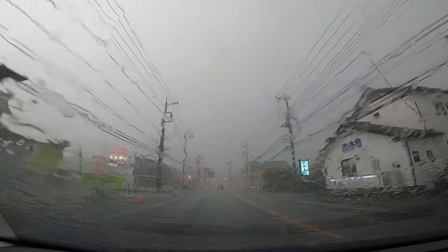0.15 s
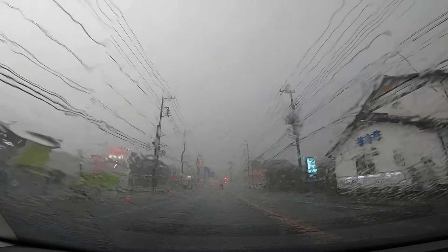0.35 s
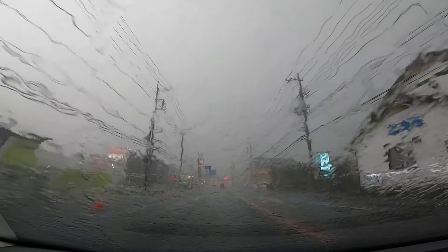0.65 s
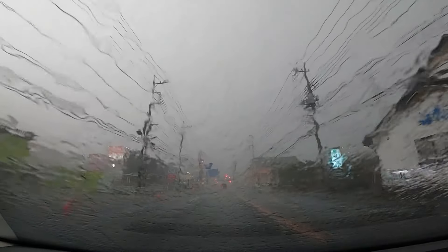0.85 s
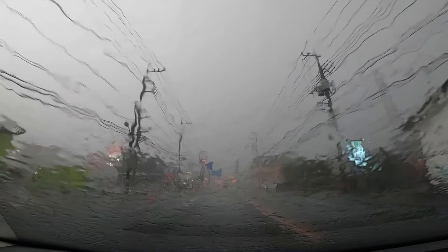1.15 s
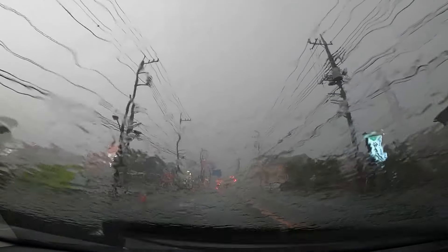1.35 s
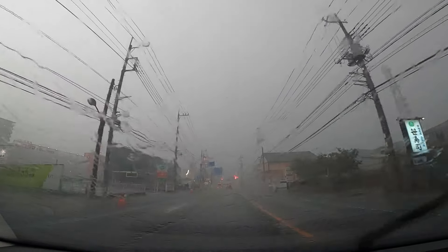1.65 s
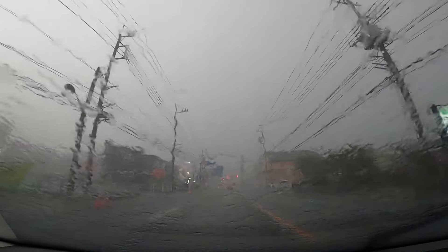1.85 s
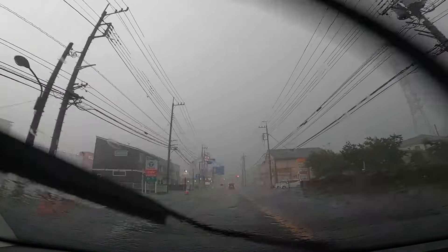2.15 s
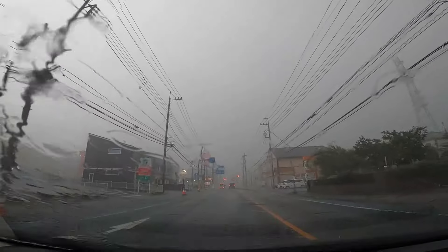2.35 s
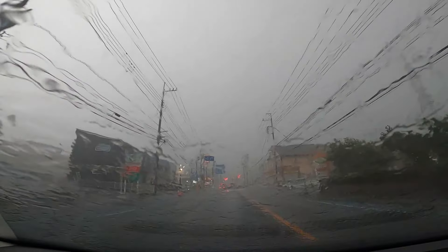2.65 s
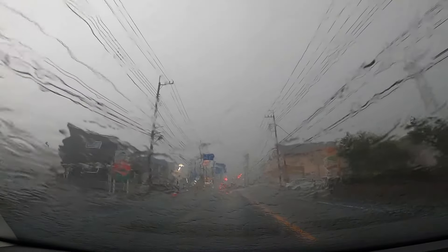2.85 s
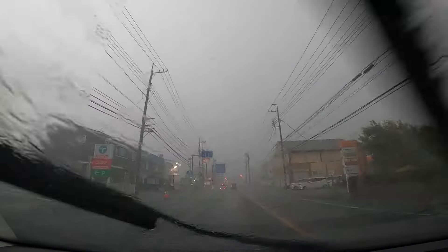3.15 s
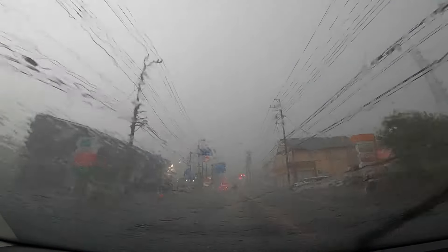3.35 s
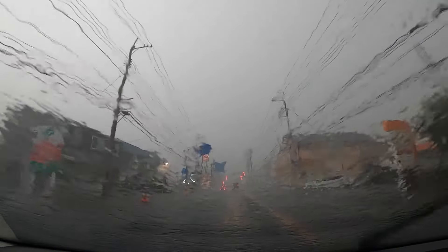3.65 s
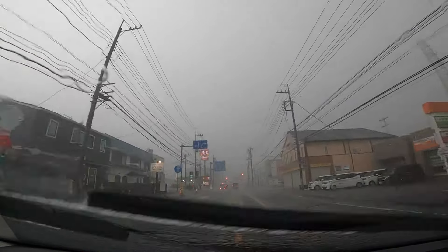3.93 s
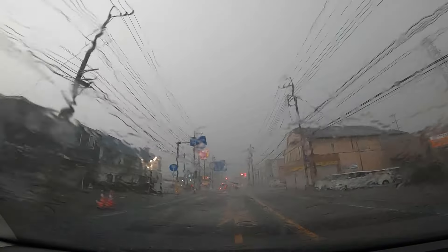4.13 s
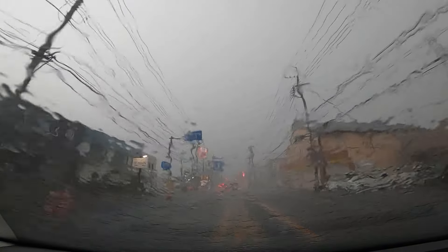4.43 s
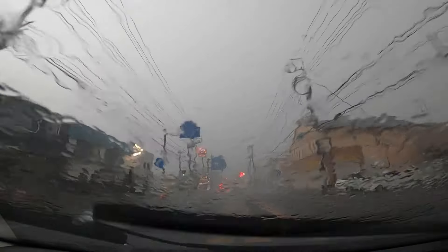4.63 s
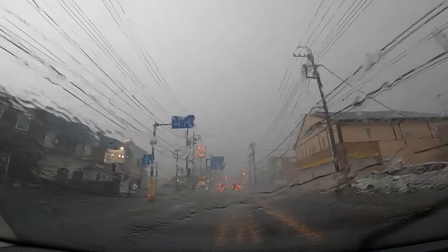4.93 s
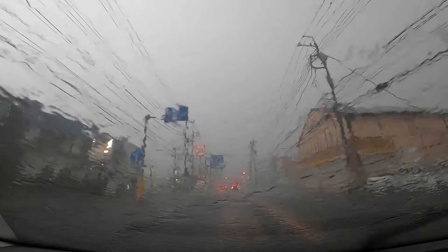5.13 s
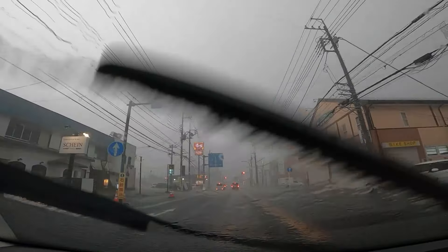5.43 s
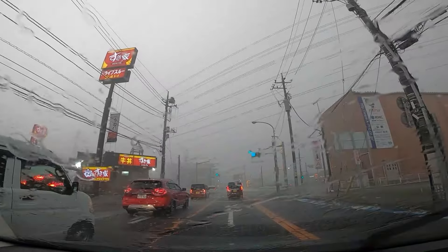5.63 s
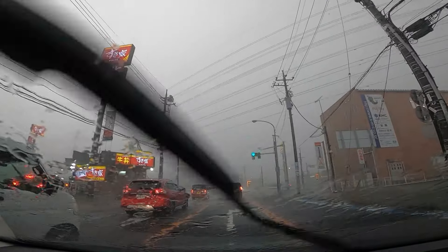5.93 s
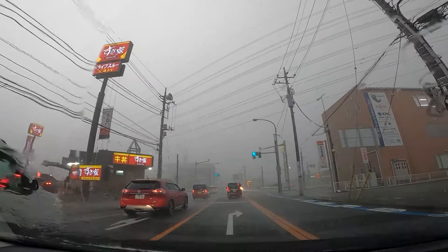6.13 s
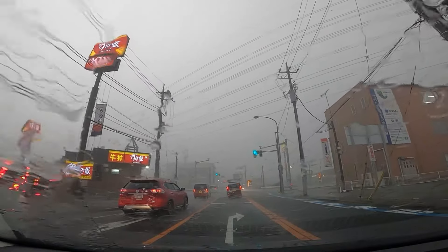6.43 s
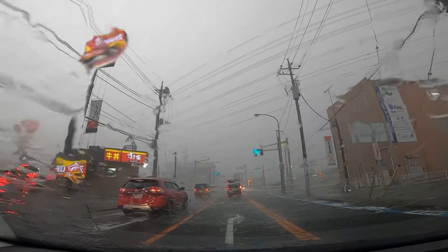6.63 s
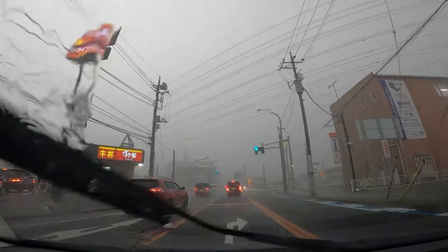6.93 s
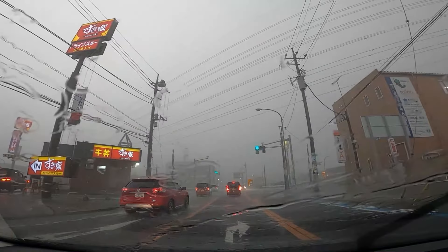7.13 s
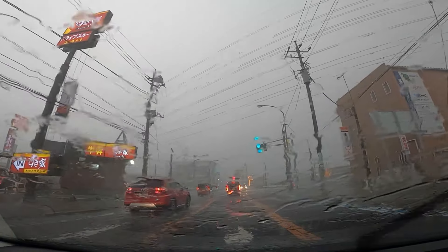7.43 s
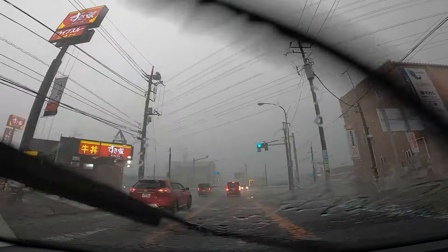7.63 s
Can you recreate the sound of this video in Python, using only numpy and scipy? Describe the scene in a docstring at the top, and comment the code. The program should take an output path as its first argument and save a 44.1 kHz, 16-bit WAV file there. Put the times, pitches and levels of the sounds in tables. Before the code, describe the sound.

A microphone inside the cabin catches wide stereo rain pattering close on the glass, with bass wind and tyre rumble beneath. Spatters thicken into a hard burst, followed by rapid muffled water thumps against the underside. The rain eases, surges again, then abruptly drops at a cut; softer patter, wet hiss and a slow car's engine hum remain.

```python
"""Rain in a downpour spatters in sheets on the windscreen and roof of a moving car: random drop impacts
ring through panel spectra, with a few fat drops; an edit click marks a cut to thinner rain. Filtered noise
makes the wet hiss, the tyres, the shudder, the boom and the drone; slugs of puddle water drum on a modal
floor pan. Late on the car is slower and the engine's hum, a sum of harmonics, comes through."""
import sys
import numpy as np
from scipy import signal
from scipy.fft import rfft, irfft, next_fast_len
from scipy.io import wavfile
from scipy.ndimage import uniform_filter1d, minimum_filter1d, map_coordinates

SR = 44100
rng = np.random.default_rng(int(sys.argv[2]) if len(sys.argv) > 2 else 0)


def materialize(psi):
    """Save the field psi as 16-bit PCM at rate SR to the path in sys.argv[1].

    A 1-D psi becomes a single channel; in a 2-D psi each row is a channel.
    """
    bounded = np.clip(np.atleast_2d(psi).T, -1, 1)
    quanta = np.round(bounded * 32767).astype(np.int16)
    wavfile.write(sys.argv[1], SR, quanta)


N = 343098

# response of the glass to a drop: (frequency [Hz], density [dB per Hz])
GLASS_PATTER = [(300, -21), (700, -7.5), (1500, -6), (2200, -4), (2950, -2), (3700, -4.5), (4500, -13),
                (6000, -10.5), (8000, -17.5), (10000, -53), (16000, -100)]
# slugs of puddle water against the floor:
# (time of the peak [s], strength [dB], splash relative to the strength [dB], centre of the thump [Hz])
WATER_SLUGS = [(1.652, -12.5, -11, 228), (1.668, -11, -28, 197), (1.733, -8, -23, 230.5),
               (1.779, -9, -14, 150), (1.798, -8.5, -15, 203), (1.843, -9.5, -17.5, 125),
               (1.859, -7.5, -15, 166), (1.881, -10.5, -22, 212), (1.913, -6, -24, 156),
               (2.004, -15, -22, 168), (2.056, -10, -30, 150), (2.085, -7.5, -17, 177),
               (2.133, -11.5, -18, 129), (2.176, -4.5, -26, 151), (2.193, -15.5, -19, 175),
               (2.22, -6, -23.5, 141), (2.404, -13.5, -19, 167.8), (2.496, -12.5, -23.5, 133),
               (2.955, -17.5, -17, 146), (3.28, -17, -12, 241), (3.782, -12, -14.5, 203),
               (4.963, -15, -20, 190), (5.461, -17, -27, 250), (7.52, -15, -12, 161)]
USUAL_RAIN_DB = -38  # reference strength for the growth of spray and wash


def rainfall():
    """Addition of powers: unrelated sheets of rain add their energy to the steady fall; strength in dB."""
    # steady rain between the sheets: (time [s], strength [dB])
    steady_fall = [(0, -38), (.8, -40.5), (1.2, -39), (1.8, -38.5), (2.2, -44), (2.31, -45.5), (2.4, -43.5),
                   (2.7, -42.5), (3.05, -44.5), (4.53, -38.5), (4.64, -43.5), (5.535, -39.5), (5.545, -48),
                   (5.85, -45.5), (6.2, -55.5), (6.7, -48.5), (7.1, -43), (7.78, -42.5)]
    # sheets blown against the car: (time of the peak [s], strength [dB], rise [s], fall [s])
    sheets = [(0.028, -36, 0.13, 0.26), (0.55, -42.5, 0.053, 0.022), (0.69, -38, 0.034, 0.034),
              (0.968, -34, 0.068, 0.05), (1.064, -33, 0.057, 0.071), (1.33, -40, 0.28, 0.12),
              (1.565, -28.5, 0.03, 0.055), (1.629, -29, 0.075, 0.11), (1.78, -36.5, 0.075, 0.086),
              (2.88, -41.5, 0.098, 0.078), (3.125, -35, 0.05, .055), (3.355, -27.5, 0.165, 0.15),
              (3.619, -35, 0.11, 0.036), (3.86, -31.5, 0.22, 0.22), (4.04, -34, 0.11, 0.15),
              (4.309, -33.5, 0.097, 0.23), (4.829, -37.5, 0.12, 0.15), (5.184, -32.5, 0.065, 0.077),
              (5.22, -35, 0.3, 0.23), (7.52, -39, 0.23, 0.19)]
    steady_db, = curves(steady_fall)
    power = amp(steady_db) ** 2
    for s, db, rise_s, fall_s in sheets:
        power = power + (amp(db) * swell(s, rise_s, fall_s)) ** 2
    return 10 * np.log10(power)


def rain(rain_db):
    """Shot noise through resonant panels: heavier rain is louder and denser, and each blow throws up spray."""
    # how much the wind chops the rain into quick spatters: (time [s], depth [dB])
    chop = [(0, 1), (.5, 1.6), (1.2, 1.6), (1.5, 1.6), (1.6, .4), (7.78, .4)]
    # colour of the spray: (frequency [Hz], density [dB per Hz])
    spray_spectrum = [(2000, -24.5), (3800, -10), (5000, 10), (6300, 5.5), (7600, -1.5), (8500, -16),
                      (10000, -20.5), (12500, -24.5), (14000, -33.5), (16000, -62)]
    # fine spray relative to its usual share: (time [s], level [dB])
    fine_spray = [(0, 1), (1.05, 0.7), (1.8, 0), (2.85, 2), (3.35, 0.5), (4.6, 0.1), (6.2, 1.5), (7.6, 1)]
    spray_usual_db, spray_growth = -45.5, 1.05  # before the fine-spray curve; growth in dB per dB of rain

    density = amp(.5 * (rain_db - rain_db.max()))
    blows = impacts(per_second=9000 * density, scatter_db=1.0) / np.sqrt(density)
    blows = unit(cabin(blows, t60=0.09, wet_db=-8.5))
    # sparser, heavier drops stand out of the sheet as separate splashes
    taps = plips(density, per_second=1500, centre_hz=4600, octaves=.45, cycles=10)
    chop_db, = curves(chop)
    spatter = amp(chop_db * (wobble(30) + wobble(110)) / np.sqrt(2))
    blows = spatter * (blows + amp(-10.5) * taps)

    patter = amp(rain_db + 2.0) * steadied(spread(struck(blows, GLASS_PATTER)), span=.05)
    fine_db, = curves(fine_spray)
    spray_db = spray_usual_db + spray_growth * (rain_db - USUAL_RAIN_DB) + fine_db + .4 * wobble(14)
    return patter + amp(spray_db) * spread(struck(blows, spray_spectrum))


def impacts(per_second, scatter_db):
    """Poisson process: blows fall independently, uneven in size, each from its own place on the panel."""
    hit = rng.random(N) < per_second / SR
    size = amp(scatter_db * np.clip(rng.standard_normal(N), -2.5, 2.5))
    place = rng.uniform(0, 2 * np.pi, N)
    return unit(hit * size * np.array([np.cos(place), np.sin(place)]))


def plips(density, per_second, centre_hz, octaves, cycles, size=256):
    """Damped oscillation: splashes in the film of water decay by 60 dB in a set number of cycles."""
    at = np.flatnonzero(rng.random(N - size) < per_second * density[:N - size] / SR)
    chance = np.clip(rng.standard_normal((len(at), 3)), -2, 2)
    pitch, strength, place = chance.T[:, :, None]
    turns = centre_hz * 2 ** (octaves * pitch) * np.arange(size) / SR
    grains = amp(2.5 * strength - 60 * turns / cycles) * np.sin(2 * np.pi * turns)
    where = (at[:, None] + np.arange(size)).ravel()
    pair = [np.bincount(where, (grains * side(np.pi * place)).ravel(), N) for side in (np.cos, np.sin)]
    return unit(np.array(pair) / np.sqrt(density))


def cabin(x, t60, wet_db, size=2048):
    """Early reflection from glass and dashboard: short decaying echoes, redrawn for each block of samples."""
    blocks = np.pad(x, ((0, 0), (0, -N % size))).reshape(2, -1, size)
    tails = rng.standard_normal(blocks.shape) * amp(-60 * np.arange(size) / SR / t60)
    tails /= np.linalg.norm(tails, axis=2, keepdims=True)
    echo = irfft(rfft(blocks, 2 * size) * rfft(tails, 2 * size))
    # the second half of each echo overlaps the next block
    joined = echo[..., :size] + np.roll(echo[..., size:], 1, axis=1)
    return x + amp(wet_db) * joined.reshape(2, -1)[:, :N]


def fat_drops():
    """Impulse excitation: a big drop ticks, knocks the glass and throws off a brief shower of droplets."""
    # fat drops: (time [s], strength [dB], left minus right [dB], strength of the knock [dB])
    drops = [(0.0464, -34, 1, 0), (0.8723, -32.5, -1, 14), (0.9093, -36, -1, 11), (0.961, -33, -4, 7),
             (1.0688, -30, 2, 7), (1.152, -35, -2, -2), (1.1862, -28, -4.5, -4), (1.2094, -37, -4, 0),
             (1.283, -39, 5, 17), (1.311, -33.5, -1, 14), (1.349, -35, -8, 9), (1.437, -33.5, -2, 15),
             (1.4752, -30, -2, 9), (1.485, -31, 1, 4), (1.491, -30, -4, 7), (1.534, -32, -5, -1),
             (2.3955, -34.5, -3, -14), (3.263, -34, -3, 0), (3.82, -35, 1, -6), (3.9949, -28, -4, -14.5),
             (5.2586, -32, -4.0, -3), (5.323, -31.5, -1, 3), (7.086, -39, 1, 5), (7.106, -36.5, 2, 14),
             (7.2986, -35.5, -4, 10)]
    # colour of the burst: (frequency [Hz], density [dB per Hz])
    splat_spectrum = [(400, -3), (1200, 9), (3000, 7.5), (6300, 0), (7800, -1.5), (9000, -18), (12500, -35),
                      (16000, -30)]
    splats, knocks = np.zeros((2, 2, N + SR))
    t = np.arange(SR // 20) / SR
    for s, db, pan_db, knock_db in drops:
        droplets = 0.4 * (rng.random(len(t)) < 900 / SR) * amp(-60 * t / 0.12)
        burst = rng.standard_normal((2, len(t))) * (0.36 * amp(-60 * t / 0.018) + droplets)
        burst[:, 0] = 1  # the tick of first contact
        burst *= amp(db + np.array([[pan_db], [-pan_db]]) / 2)
        splats[:, round(s * SR):][:, :len(t)] += amp(9.0) * burst
        knocks[:, round(s * SR):][:, :len(t)] += amp(knock_db - 6) * burst
    return struck(splats, splat_spectrum) + struck(knocks, GLASS_PATTER)


def wash(rain_db):
    """Turbulent noise of water on roof and tyres, with duller shot noise of rain on steel; both follow the rain."""
    # colour of hiss and drumming: (frequency [Hz], density [dB per Hz])
    wet_spectrum = [(200, -1), (380, -6), (500, 0.5), (680, -5), (830, 0), (920, 0), (1200, -1), (1800, -6),
                    (2500, -10.5), (4000, -21), (8000, -37.5), (16000, -100)]
    usual_db, growth, slow_gain_db = -35.5, 0.63, 6  # growth in dB per dB of rain; gain once the car is slow
    level_db = usual_db + growth * (rain_db - USUAL_RAIN_DB) + slow_gain_db * slowness()
    drumming = spread(struck(impacts(per_second=900, scatter_db=2.5), wet_spectrum))
    return amp(level_db + 0.22 * wobble(13)) * (rush(wet_spectrum) + amp(-2.5) * drumming)


def slowness():
    """Smoothed step function: 0 while the car is at speed, 1 once it is slow."""
    slow_from_s = 5.54
    return uniform_filter1d(1. * (np.arange(N) / SR > slow_from_s), SR // 100)


def windscreen(x):
    """Transmission through a resonant plate: some pitches pass more readily than others."""
    # resonances and the hollows between them: (centre [Hz], half width [Hz], gain [dB])
    glass_modes = [(844, 28, -4), (928, 16, 2), (980, 16, 1), (1193, 54, 1.5), (1345, 77, -1.5),
                   (1482, 16, 3.5), (1543, 22, 2), (1777, 36, 2.5), (2000, 51, -2.5), (2170, 88, 2),
                   (2370, 41, -3), (2980, 19, 0.5)]

    def gain(hz):
        return amp(sum(db * np.exp(-((hz - centre) / width) ** 2) for centre, width, db in glass_modes))

    return filtered(x, gain)


def puddle():
    """Modal excitation: a slug flexes the floor pan, leaves its modes ringing and splashes in the arches."""
    # floor pan: (nominal frequency [Hz], relative level [dB], decay by 60 dB [s])
    floor_modes = [(66, 11.5, 0.14), (125.3, 1, 0.15), (161.5, 7.5, 0.14), (195, 1.5, 0.099),
                   (250, -1.5, 0.17), (351.6, -8.5, 0.1), (481, 6.5, 0.1)]
    # colour of the splash in the wheel arch: (frequency [Hz], density [dB per Hz])
    splash_spectrum = [(150, -13), (250, 3), (370, -5.5), (425, -0.5), (490, 8.5), (580, -13.5),
                       (730, -5.5), (930, 0.5), (1400, -10), (2500, -16.5), (8000, -56)]
    rise_s, fall_s = .009, .015  # how quickly a slug pushes the floor and lets go
    focus_db = 7  # modes an octave from the slug's centre are driven this much less
    ring_db = -7  # peak of the ring relative to the full push
    thumps, splashes = np.zeros((2, N + SR))
    t = np.arange(SR // 4) / SR
    late = t - 2 * rise_s  # time after the peak
    push = np.exp(-np.minimum((late / np.where(late < 0, rise_s, fall_s)) ** 2, 20))
    onset = np.exp(-(np.minimum(late, 0) / rise_s) ** 2)
    for s, db, splash_db, centre_hz in WATER_SLUGS:
        flex = push * np.cos(2 * np.pi * centre_hz * late + rng.uniform(0, 2 * np.pi))
        modes = 0
        for hz, level_db, t60 in floor_modes:
            # each blow excites and tunes the modes a little differently
            level_chance, pitch_chance = rng.standard_normal(2)
            driven_db = level_db - focus_db * np.log2(hz / centre_hz) ** 2 + 2 * level_chance
            mode_hz = hz * (1 + 0.045 * pitch_chance)
            modes = modes + amp(driven_db - 60 * t / t60) * np.sin(2 * np.pi * mode_hz * t)
        ring = onset * (1 - push) * modes
        thump = flex + amp(ring_db) * ring / np.abs(ring).max()
        start = round((s - 2 * rise_s) * SR)
        thumps[start:][:len(t)] += amp(db - 2.5) * thump
        splash_decay_db = -60 * np.maximum(late, 0) / 0.11
        splashes[start:][:len(t)] += onset * amp(db + splash_db - 3.5 + splash_decay_db)
    return thumps[:N] + splashes[:N] * rush(splash_spectrum)


def tyres():
    """Filtered noise: tread rumble and water flung into the wheel arches surge in power with each slug."""
    # tyres on the wet road before wavering and surges: (time [s], rumble [dB], wheel-arch roar [dB])
    tyre_levels = [(0, -28, -35.5), (.7, -30.5, -37), (1.5, -26.5, -32), (1.75, -19.5, -26), (2, -25, -31),
                   (2.2, -29, -29.5), (2.3, -25, -34), (2.65, -29, -37), (3.35, -29, -31.5),
                   (3.55, -26.5, -34), (3.9, -25, -29.5), (4.6, -27.5, -33), (5.3, -27, -33),
                   (5.9, -28.5, -33), (6.2, -30, -38.5), (6.45, -31, -33.5), (6.65, -34.5, -39),
                   (7.05, -29.5, -33), (7.78, -31.5, -35.5)]
    # colour of the tread: (frequency [Hz], density [dB per Hz])
    rumble_spectrum = [(60, -22), (102, -5.5), (125, 6), (150, -1.5), (195, 1.5), (230, -7.5), (300, -23),
                       (2500, -120)]
    # colour of water in the arches: (frequency [Hz], density [dB per Hz])
    roar_spectrum = [(150, -33.5), (230, -2.5), (265, 0.5), (300, -4.5), (360, -3), (450, -14.5),
                     (540, -14), (800, -20), (6000, -120)]
    surge_rise_s, surge_fall_s = 0.035, 0.037
    surge_rumble_db, surge_roar_db = -16, -1  # relative to the slug and to its splash
    rumble_db, roar_db = curves(tyre_levels)
    rumble = amp(rumble_db + 0.59 * wobble(12))
    roar = amp(roar_db + 1.27 * wobble(14))
    for s, db, splash_db, _ in WATER_SLUGS:
        surge = amp(db) * swell(s, surge_rise_s, surge_fall_s)
        rumble = np.hypot(rumble, amp(surge_rumble_db) * surge)
        roar = np.hypot(roar, amp(splash_db + surge_roar_db) * surge)
    tread = rumble * steadied(rush(rumble_spectrum), span=0.097)
    return tread + roar * steadied(rush(roar_spectrum), span=.1)


def engine():
    """Harmonic series on the firing rate: wavering overtones are lifted where they meet the cabin's resonance."""
    # engine: (time [s], mean firing rate [Hz], level [dB])
    firing = [(0, 43.3, -34), (3.8, 43.66, -36), (4.35, 45.5, -26), (4.7, 44.24, -23), (4.95, 41.97, -31),
              (5.26, 41.62, -29), (5.35, 41.75, -23), (5.47, 38.9, -28), (5.6, 38.54, -28),
              (5.74, 40.44, -23), (5.85, 42.5, -17), (5.98, 44.36, -18), (6.12, 44.87, -19.5),
              (6.41, 46.2, -16.5), (6.53, 44.7, -20), (6.74, 41.08, -27), (6.9, 37.07, -30.5),
              (7.27, 34.76, -36), (7.55, 41.57, -19.5), (7.78, 43.8, -22)]
    # overtones: (multiple of the firing rate, relative level [dB], wavering [dB],
    # growth [dB per dB of engine level])
    overtones = [(1, -1.2, 1.6, 1), (2, -10.5, 2, .5), (3, -13.5, 2.5, 0.2), (4, -18.5, 2, 0.2),
                 (5, -20.5, 2.5, 0.47)]
    usual_db = -23  # engine level at which the relative levels hold
    cabin_hz, cabin_width_hz, cabin_lift_db = 77.05, 6.7, 10.5
    hz, db = curves(firing)
    phase = 2 * np.pi * np.cumsum(hz * (1 + .006 * wobble(9))) / SR
    hum = 0
    for k, level_db, waver_db, growth in overtones:
        lift_db = cabin_lift_db * np.exp(-((k * hz - cabin_hz) / cabin_width_hz) ** 2)
        overtone_db = level_db + growth * (db - usual_db) + lift_db + waver_db * wobble(8)
        hum = hum + amp(overtone_db) * np.sin(k * phase + rng.uniform(0, 2 * np.pi))
    return np.sqrt(2) * amp(usual_db) * hum


def road():
    """Band-limited noise: wind and road shake the cabin as a slow shudder, a deep boom and a floor drone."""
    # wind and road, before a fixed trim: (time [s], boom [dB], floor drone [dB])
    road_levels = [(0, -23.5, -28), (.35, -29, -31), (.5, -24, -22.5), (1, -23.5, -24.5), (1.4, -24, -19.5),
                   (1.62, -17.5, -23), (1.82, -24, -18.5), (2.12, -22, -24), (2.3, -28, -26.5),
                   (2.8, -30, -35), (3, -23.5, -27.5), (3.7, -25.5, -24.5), (4.1, -17, -26),
                   (4.7, -22, -25), (5, -36, -28.5), (5.25, -39, -17.5), (5.37, -13, -26.5),
                   (5.6, -32, -30.5), (6.6, -31, -31.5), (6.88, -21, -33), (7.2, -29, -29.5),
                   (7.78, -25, -28.5)]
    # slow shudder of the body in the wind: (time [s], level [dB])
    shudder_levels = [(0, -28), (.18, -25), (.55, -32), (.8, -33), (1.5, -27.5), (2.25, -35), (3.6, -27.5),
                      (4.12, -19.5), (4.3, -32), (4.75, -19.5), (5.05, -29.5), (5.4, -23), (5.7, -34.5),
                      (6.2, -43), (6.6, -42), (7.78, -30)]
    # colours of shudder, boom and drone: (frequency [Hz], density [dB per Hz])
    shudder_spectrum = [(8, -38), (18, -18), (25, 0.5), (31, 1.5), (38, -21.5), (120, -100)]
    boom_spectrum = [(20, -41), (36, -9.5), (46, 0), (60, -8.5), (90, -25), (500, -120)]
    drone_spectrum = [(35, -33), (62, -2.5), (82, 1), (100, -1), (140, -25), (800, -120)]
    boom_db, drone_db = curves(road_levels)
    shudder_db, = curves(shudder_levels)
    shudder = amp(shudder_db) * steadied(rush(shudder_spectrum), span=0.17)
    boom = amp(boom_db - 1.5) * steadied(rush(boom_spectrum), span=0.14)
    drone = amp(drone_db - 2.5) * steadied(rush(drone_spectrum), span=0.22)
    return shudder + boom + drone


def edit_click(s, db):
    """Unit impulse: an edit click with a flat spectrum, at the cut to thinner rain."""
    return amp(db) * (np.arange(N) == round(s * SR))


def amp(db):
    """Logarithmic level: decibels to amplitude gain."""
    return 10 ** (np.asarray(db) / 20)


def unit(x):
    """Normalisation of power: scale to rms 1."""
    return x / np.sqrt(np.mean(x ** 2) + 1e-20)


def along(points, hz):
    """Interpolation of (frequency, value) points on a logarithmic frequency axis."""
    f, v = np.transpose(points)
    return np.interp(np.log(hz + 1), np.log(f + 1), v)


def curves(rows):
    """Linear interpolation in time: one value per sample for each column after the time."""
    s, *cols = np.transpose(rows)
    return [np.interp(np.arange(N) / SR, s, c) for c in cols]


def swell(s, rise_s, fall_s):
    """Gaussian envelope with unequal sides: a gain that peaks at time s."""
    t = np.arange(N) / SR - s
    return np.exp(-np.minimum((t / np.where(t < 0, rise_s, fall_s)) ** 2, 20))


def wobble(rate):
    """Spline through random knots: a smooth random curve, rate knots a second."""
    return map_coordinates(rng.standard_normal(400), [np.arange(N) * rate / SR], mode="wrap")


def filtered(x, response):
    """Linear filtering: multiply the spectrum of x by a response of frequency."""
    m = next_fast_len(N + SR // 2)
    return irfft(rfft(x, m) * response(np.fft.rfftfreq(m, 1 / SR)), m)[..., :N]


def struck(x, spectrum, size=2048):
    """Minimum-phase response: a panel that rings only after each blow."""
    cepstrum = irfft(np.log(amp(along(spectrum, np.fft.rfftfreq(size, 1 / SR)))))
    # folding the cepstrum onto positive times makes the response causal
    cepstrum[1:size // 2] *= 2
    cepstrum[size // 2 + 1:] = 0
    ring = irfft(np.exp(rfft(cepstrum)))
    return signal.fftconvolve(x, ring[None] / np.abs(ring).max(), axes=1)[:, :N]


def spread(pair):
    """Interaural coherence: two unrelated signals become left and right, bass shared and treble apart."""
    # (frequency [Hz], left-right correlation [-1 to 1])
    alike = [(30, .99), (140, 0.99), (280, 0.99), (500, 0.86), (1000, 0.77), (2000, 0.72), (4000, 0.23),
             (8000, 0.087)]

    def mid_side_gains(hz):
        turn = np.arccos(np.clip(along(alike, hz), -1, 1)) / 2
        return np.array([np.cos(turn), np.sin(turn)])

    mid, side = filtered(pair, mid_side_gains)
    return np.array([mid + side, mid - side]) / np.std(mid)


def rush(spectrum):
    """Spectral shaping of white noise: coloured stereo noise of about unit level."""
    return spread(filtered(rng.standard_normal((2, N)), lambda hz: amp(along(spectrum, hz))))


def steadied(x, span):
    """Division by the running rms: evens out chance swells of a noise longer than span seconds."""
    power = uniform_filter1d(np.mean(x ** 2, 0), int(span * SR) + 1)
    return x / np.sqrt(np.abs(power) + 1e-6)


def scene():
    """Superposition of all sources; level and arrival time differ between left and right inside the car."""
    # balance of the inside sound: (frequency [Hz], left minus right [dB])
    lean = [(30, 0.5), (125, -0.1), (500, -0.6), (2000, -2), (4000, -4.5), (8000, 2), (12000, -0.5)]
    left_lead_s = 2.3e-5
    rain_db = rainfall()
    through_glass = windscreen(rain(rain_db) + wash(rain_db))
    inside = through_glass + puddle() + tyres() + engine() + road()
    sides = np.array([[1], [-1]]) / 2

    def balance(hz):
        return amp(sides * along(lean, hz)) * np.exp(2j * np.pi * hz * sides * left_lead_s)

    return filtered(inside, balance) + fat_drops() + edit_click(s=5.5385, db=-26)


def record(dry):
    """Peak limiting and band limiting: eases down the highest peaks, then cuts steeply above the band."""
    top_hz = 15600
    needed = np.minimum(1, amp(-2.7) / (np.abs(dry).max(0) + 1e-9))
    gain = uniform_filter1d(minimum_filter1d(needed, SR // 50), SR // 50)
    return filtered(dry * gain, lambda hz: 1 / (1 + (hz / top_hz) ** 80))


dry = scene()
out = record(dry)
materialize(out)
```